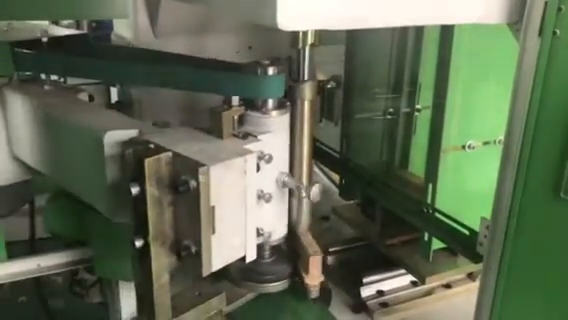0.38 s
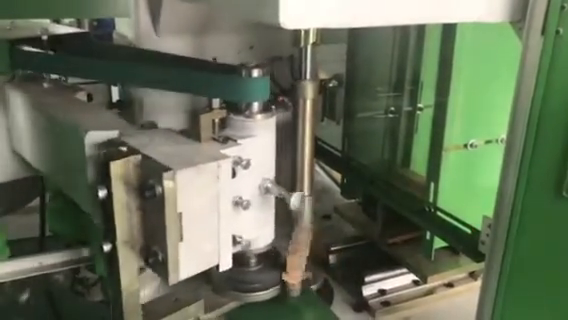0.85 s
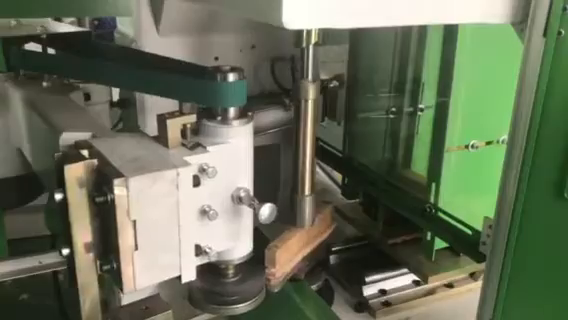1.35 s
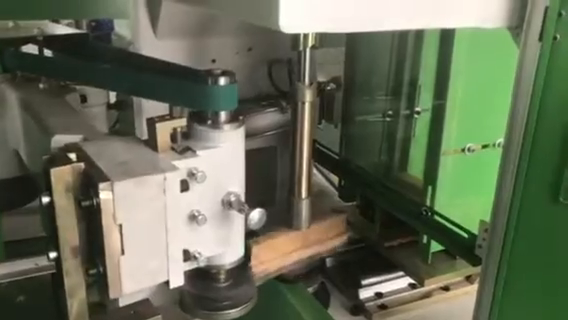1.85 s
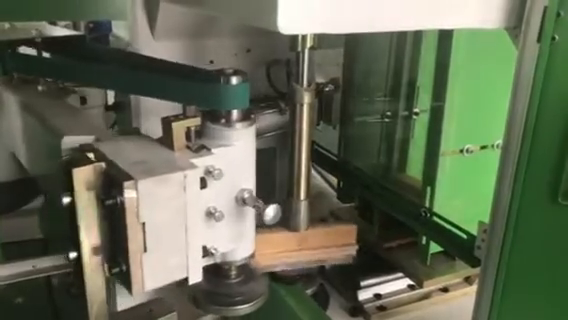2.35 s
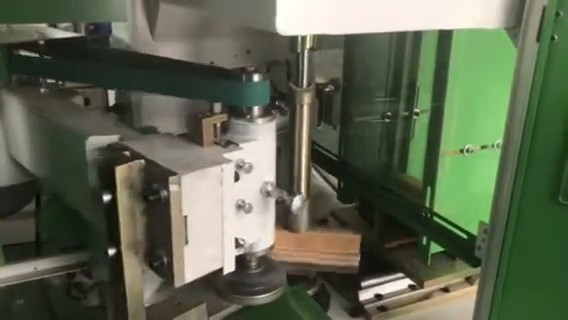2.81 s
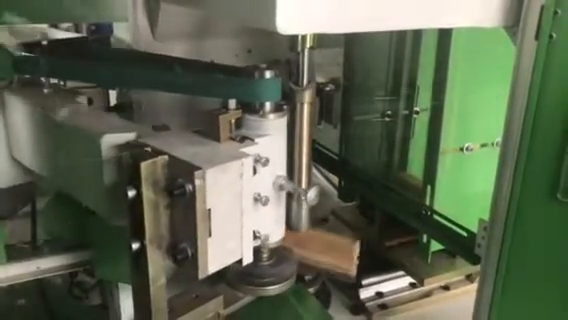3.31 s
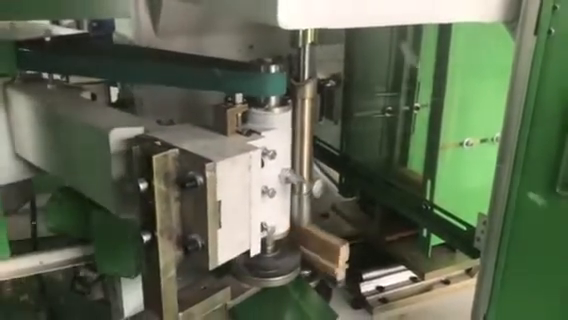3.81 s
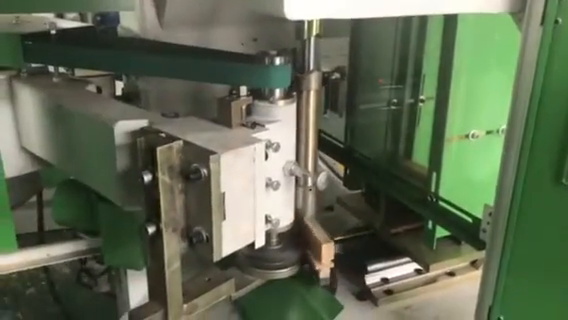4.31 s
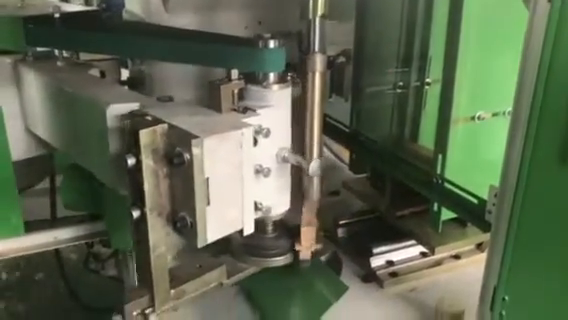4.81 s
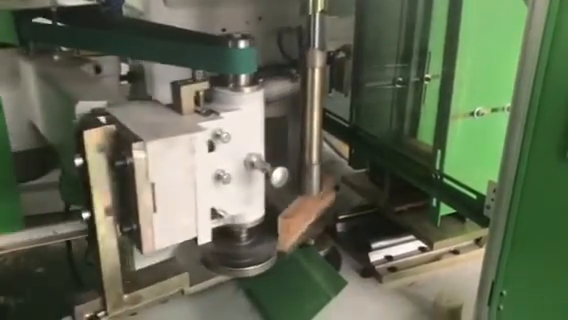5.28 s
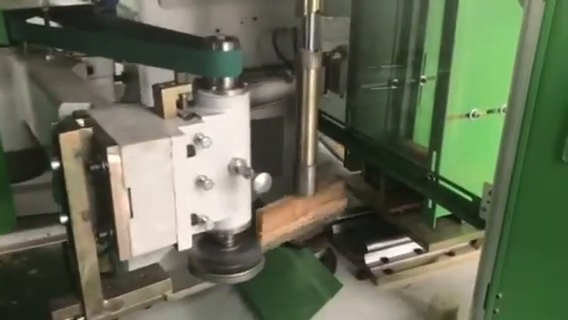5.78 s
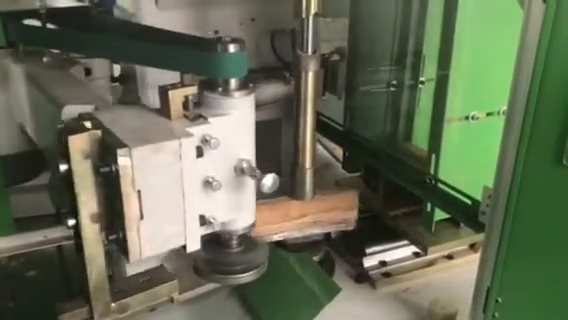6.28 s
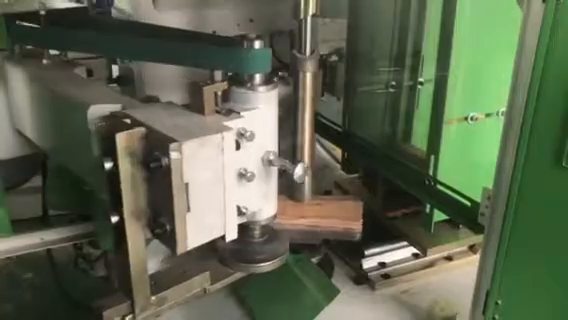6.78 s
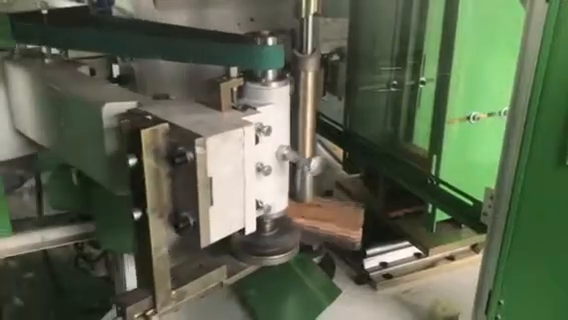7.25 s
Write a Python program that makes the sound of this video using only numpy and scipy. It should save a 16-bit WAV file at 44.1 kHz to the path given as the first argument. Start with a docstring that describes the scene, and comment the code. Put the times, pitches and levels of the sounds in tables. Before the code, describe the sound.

Close, dry mono sound of a wood shaper already at full speed. A steady low hum near 190 Hz, faint rumble and broad belt-and-motor roar run throughout, with a whine around 1150 Hz and its overtones. At about 0.3 s the knives bite the blank with a sharp buzzing attack, the pitch sagging slightly for an instant, and another hard bite follows near 0.45 s. The rasp continues with fluttering whistles; soft low thumps come between 1 and 2 s and high squeals swell at 1.4-1.9 s. A heavier, fuller ringing cut runs 1.9-2.7 s, then thinner, shifting whine to 4.7 s. Near 5.1 s the whine surges and bites at a corner. From 5.25 to 5.6 s the cut eases to lighter brushing, then rebuilds; ringing wood, bright squeals and chip hiss fill 5.8-6.7 s, and cutting carries on to the abrupt end around 7.4 s.

```python
"""Copy shaper, close by

A copy shaper mills a wooden blank with a six-knife head on a belt-driven spindle, close on a mono microphone.
The spindle hums once a turn and sags under load; the knives whine at six times that rate and its multiples,
and their unequal bite fills in every order between: all are sines locked to the turning spindle.
Blank and cutter head ring, and the frame thumps softly, over filtered noise for belt, motor and chips."""
import sys
import numpy as np
from scipy import signal
from scipy.fft import rfft, irfft, next_fast_len
from scipy.io import wavfile
from scipy.ndimage import uniform_filter1d, map_coordinates

SR = 44100
rng = np.random.default_rng(int(sys.argv[2]) if len(sys.argv) > 2 else 0)


def wav_record(signal):
    """Record a signal, one row per channel, as 16-bit PCM in the file named by sys.argv[1]."""
    frames = np.transpose(np.atleast_2d(signal))
    bounded = np.clip(frames, -1, 1)
    # unit amplitude maps onto the largest positive 16-bit level
    quanta = np.round(bounded * 32767).astype(np.int16)
    wavfile.write(sys.argv[1], SR, quanta)


def gain_from_db(level_db):
    """Convert decibel levels to linear amplitude factors (20 dB per decade)."""
    decades = np.asarray(level_db, float) / 20
    return 10 ** decades


N = 325439
STEPS = np.arange(0, N / SR + .01, .002)  # times of the slow controls [s]
SWELL_S, LEAVE_S = 0.1, 0.085  # rise and fall of rings and whistles; time to leave the wood


def unit(x):
    """Scales a signal to rms 1."""
    return x / np.sqrt(np.mean(x ** 2) + 1e-20)


def curves(rows):
    """Reads one control on the steps for each column after the time."""
    s, *cols = np.transpose(rows)
    return [np.interp(STEPS, s, c) for c in cols]


def smooth(control):
    """Reads a control at every sample."""
    return np.interp(np.arange(N) / SR, STEPS, control).astype(np.float32)


def wobble(rate):
    """A smooth random curve on the steps, rate knots a second."""
    return map_coordinates(rng.standard_normal(400), [STEPS * rate], mode="wrap")


def hump(s, length, rise, fall):
    """Up to 1 and back, reaching 0 by 0.37 of a ramp outside the span; short spans may peak below 1."""
    return np.clip(np.minimum((STEPS - s) / rise, (s + length - STEPS) / fall) + 0.37, 0, 1)


def rush(spectrum, patchy_db, panels=()):
    """Noise of rms 1 with patches of random gain, coloured by a spectrum and resonant panels."""
    z = signal.stft(rng.standard_normal(N + 512), nperseg=512)[2]
    field = uniform_filter1d(rng.standard_normal(z.shape), size=6, axis=0)
    field = uniform_filter1d(field, size=12, axis=1)
    noise = signal.istft(z * gain_from_db(patchy_db * unit(field)), nperseg=512)[1]
    m = next_fast_len(len(noise))
    hz = np.fft.rfftfreq(m, 1 / SR) + 1
    f, db = np.transpose(spectrum)
    colour = gain_from_db(np.interp(np.log(hz), np.log(f), db))
    peaks = sum(gain_from_db(2 * g) / (1 + (2 * (hz - c) / w) ** 2) for c, w, g in panels)
    return unit(irfft(rfft(noise, m) * colour * np.sqrt(1 + peaks), m)[:N])


# Speed of the spindle: (time [s], turns per second [Hz])
SPINDLE_SPEED = [(0.31, 192.0), (0.35, 190.18), (0.4, 189.53), (0.425, 191.7), (0.5, 191.4), (1.02, 191.4),
                 (1.25, 191.75), (1.86, 191.8), (1.95, 191.45), (2.78, 191.86), (2.95, 191.35),
                 (4.32, 191.38), (4.79, 191.0), (5.04, 190.25), (5.19, 191.5), (5.42, 191.88),
                 (6.55, 191.78), (6.68, 191.02), (6.99, 191.6), (7.33, 191.48)]


def spindle_turn():
    """Angle of the spindle [rad], summed from its speed and wrapped each turn."""
    turns = np.cumsum(smooth(curves(SPINDLE_SPEED)[0]), dtype=float) / SR
    return (2 * np.pi * (turns % 1)).astype(np.float32)


# Knives in the wood: (start [s], end [s], rise [s])
CUTTING_PASSES = [(0.29, 5.26, 0.058), (5.62, 7.6, 0.39)]


def cutting():
    """1 while the knives are in the wood, 0 while the head spins free."""
    return sum(hump(start, end - start, rise, LEAVE_S) for start, end, rise in CUTTING_PASSES)


# Low rumble, relative spectrum: (frequency [Hz], density [dB per Hz])
RUMBLE_SPECTRUM = [(20, -31), (50, 1.5), (110, 1.5), (160, 7), (230, -34)]


def rumble():
    """A low band of noise that wavers gently under everything."""
    return smooth(gain_from_db(-49.0 + 1.0 * wobble(9))) * rush(RUMBLE_SPECTRUM, patchy_db=1.0)


# Chip hiss, relative spectrum: (frequency [Hz], density [dB per Hz])
HISS_SPECTRUM = [(2500, -30), (5000, -3), (7000, .3), (8800, -1.5), (10500, -3), (12000, -1.5),
                 (14000, -.5), (15700, .5)]


def chip_hiss(turn, roar_db):
    """Bright noise follows part of the roar's swings, rises in the cut and throbs faintly once a turn."""
    idle_db, follows, cut_db = -24.5, 0.43, 2.15  # base [dB], share of the roar's swing, rise in the cut [dB]
    level_db = idle_db + follows * (roar_db - roar_db.mean()) + cut_db * cutting()
    level = smooth(gain_from_db(level_db + .5 * wobble(20) + .9 * wobble(45)))
    return level * (1 + .15 * np.sin(turn)) * rush(HISS_SPECTRUM, patchy_db=.7)


# Machine roar, relative spectrum: (frequency [Hz], density [dB per Hz])
ROAR_SPECTRUM = [(90, -53), (170, -9.5), (300, -10.5), (460, -10), (700, -6), (1000, -0.5), (1300, -2),
                 (1650, -3), (2000, -1.5), (3000, 0.5), (3700, -1.5), (4400, -4.5), (6000, -10.5),
                 (9000, -24.5)]
# Cabinet panels that colour the roar: (frequency [Hz], width [Hz], added resonance over the roar [dB])
CABINET_PANELS = [(316, 46, 4), (697, 6.9, 7.5), (860, 35, -2.5), (1000, 30, -17.5)]


def machine_roar(turn, roar_db):
    """Belt and motor: noise through resonant panels, throbbing faintly once a turn."""
    level = smooth(gain_from_db(roar_db + .3 * wobble(12) + .4 * wobble(40)))
    throb = 1 + 0.09 * np.sin(turn)
    return level * throb * rush(ROAR_SPECTRUM, patchy_db=.4, panels=CABINET_PANELS)


# Jolts of the frame: (time [s], length [s], frequency [Hz], peak level [dB])
FRAME_THUMPS = [(1.005, .05, 140, -34), (1.315, 0.07, 144, -30), (1.61, 0.059, 125, -33),
                (1.81, 0.061, 140, -31), (1.935, 0.049, 140, -36), (3.75, 0.25, 102, -40)]


def frame_thumps():
    """The feed carriage jolts the frame: short soft swells of a low mode."""
    sound = np.zeros(N + SR)
    for s, length, hz, db in FRAME_THUMPS:
        t = np.arange(round(length * SR)) / SR
        swell = np.sin(np.pi * t / length) ** 2
        sound[round(s * SR):][:len(t)] += gain_from_db(db) * swell * np.sin(2 * np.pi * hz * t)
    return sound[:N]


# Base strength of spindle orders 1, 2, 3, ..: (level [dB])
ORDER_LEVELS = [-29, -50, -48, -50, -38, -21, -38, -43, -48, -41, -39, -28, -36, -43, -37, -34, -40, -31,
                -33, -45, -48, -43, -39, -30, -43, -39, -47, -45, -44, -35, -44, -41, -49, -45, -40, -37,
                -42, -46, -53, -45, -42, -34, -44, -49, -54, -33, -40, -34, -45, -50, -53, -42, -44, -37,
                -44, -49, -53, -39, -40, -32, -44, -46, -54, -48, -46, -37, -45, -50, -52, -49, -46, -38,
                -42, -52, -54, -50, -47, -36, -46, -52, -55, -51]


def orders(group, level_db, drift_db, drift_rate, flicker_db):
    """Strengths of spindle orders under one control; each drifts and flickers at random on its own."""
    strength = {}
    for k in group:
        drift = drift_db * wobble(drift_rate)
        flicker = flicker_db * (wobble(16) + 1.25 * wobble(45))
        strength[k] = gain_from_db(ORDER_LEVELS[k - 1] + level_db) * unit(gain_from_db(drift + flicker))
    return strength


# Hard bites at the corners of the blank: (time [s], length [s], lift [dB], scaled for some orders)
CORNER_BITES = [(0.302, 0.024, 0.5), (0.414, 0.02, 6), (0.45, 0.016, 7.5), (5.154, 0.055, 3), (6.4, .14, 1),
                (6.64, 0.061, 3)]
# The knives only brush the blank between passes: (time [s], length [s], share of full contact)
BRUSHING = (5.2, .7, .8)
# Heavy cuts along the side of the blank: (time [s], length [s], lift [dB], scaled for high overtones)
HEAVY_CUTS = [(1.846, 0.85, 2), (5.848, .85, 0)]


def knife_load():
    """How the wood loads the knives [dB]: bites, full contact, brushing contact and heavy cuts."""
    idle_db = -17  # overtones while the head spins free
    bite_db = sum(db * hump(s, length, 0.01, 0.032) for s, length, db in CORNER_BITES)
    contact = cutting()
    start, length, share = BRUSHING
    brush = np.maximum(contact, share * hump(start, length, LEAVE_S, LEAVE_S))
    load_db = idle_db * (1 - contact) + bite_db
    brush_db = idle_db * (1 - brush) + bite_db
    heavy_db = sum(db * hump(s, length, SWELL_S, SWELL_S) for s, length, db in HEAVY_CUTS)
    return bite_db, load_db, brush_db, heavy_db


# Spindle orders of each ringing part: blank, lower head squeal, upper head squeal
PART_ORDERS = [
    [13, 14, 15, 16, 17, 19],
    [46, 47, 48],
    [58, 59, 60],
]
# Level of each part between its rings, over its base: (level [dB])
PART_QUIET = [-8.5, -6.5, -4]
# A part rings up: (time [s], length [s], part: 0 blank, 1 lower squeal, 2 upper squeal, level over base [dB])
PART_RINGS = [(0.75, 0.13, 2, 3), (1.35, .56, 1, 6.6), (1.4, 0.49, 2, 7.4), (1.851, .9, 0, 2),
              (1.9, 0.87, 1, 0.94), (1.9, .7, 2, 0.27), (2.87, 0.085, 1, 4.2), (2.87, .1, 2, 3.9),
              (3.2, .45, 0, 0.58), (4.05, .4, 2, 0.9), (4.3, .3, 0, 0.67), (5.82, 0.17, 0, 3.1),
              (5.9, 0.2, 1, 5.3), (5.9, 0.16, 2, 2.4), (6.15, .6, 0, 2.2), (6.15, 0.33, 1, 1.5),
              (6.5, .15, 2, 2.8)]


def part_rings(load_db):
    """Resonances of blank and cutter head lift a few neighbouring orders."""
    strength = {}
    for part, group in enumerate(PART_ORDERS):
        ring = gain_from_db(PART_QUIET[part] + load_db)
        for s, length, which, db in PART_RINGS:
            if round(which) == part:
                ring = ring + gain_from_db(db) * hump(s, length, SWELL_S, SWELL_S)
        group_strength = orders(group, 0, drift_db=1.25, drift_rate=3.5, flicker_db=1.35)
        strength |= {k: ring * gain for k, gain in group_strength.items()}
    return strength


# Single orders that sing out: (time [s], length [s], spindle order, level at full swell before chatter [dB])
SINGING_ORDERS = [(0.31, 0.086, 66, -23), (0.353, .13, 18, -22.5), (0.44, 0.15, 24, -25.5),
                  (0.6, .08, 24, -30), (0.66, .15, 72, -30), (0.45, .65, 7, -35), (0.67, 0.21, 54, -29.5),
                  (0.806, .36, 17, -26.5), (1.08, 0.078, 18, -22.5), (1.1, 0.21, 48, -27),
                  (1.15, 0.43, 54, -31), (1.3, 0.45, 18, -29), (1.3, 0.66, 24, -30), (1.36, .34, 42, -31),
                  (1.6, 0.25, 35, -28.5), (1.58, 0.22, 54, -26), (1.99, 0.35, 24, -23),
                  (2.05, 0.71, 18, -25.5), (2.2, 0.37, 26, -28.5), (2.3, 0.27, 36, -28),
                  (2.443, 0.15, 54, -24.5), (2.429, 0.43, 16, -27.5), (2.017, 1.04, 7, -34.5),
                  (2.9, 2.1, 5, -36), (3.9, 1.2, 2, -45), (2.954, 0.41, 24, -29), (3.05, .58, 11, -30.5),
                  (3.32, .28, 36, -28.5), (3.448, 0.52, 18, -28), (3.708, 1.02, 3, -41),
                  (3.79, 0.37, 48, -31), (3.95, 0.78, 18, -34.5), (3.99, .17, 66, -29),
                  (4.39, .29, 72, -30), (4.1, 0.19, 24, -39), (4.6, 0.22, 54, -29), (4.643, .2, 32, -28),
                  (4.784, 0.094, 18, -26), (4.95, .15, 78, -27), (4.994, 0.2, 24, -23.5),
                  (5.0, .28, 48, -33), (5.13, .08, 17, -23), (5.127, 0.15, 18, -27), (5.143, .12, 54, -27),
                  (5.524, 0.1, 24, -26), (5.82, .08, 18, -33), (5.9, .08, 24, -23), (5.91, .14, 66, -29),
                  (5.96, 0.33, 41, -29), (6.22, .28, 24, -30), (6.274, .25, 42, -25.5),
                  (6.36, 0.19, 30, -24.5), (6.36, 0.49, 18, -29), (6.42, 0.24, 16, -24.5),
                  (6.5, 0.18, 41, -26), (6.512, 0.12, 54, -22.5), (6.683, .2, 7, -27.5),
                  (6.735, 0.23, 30, -27.5), (6.955, 0.36, 24, -25), (6.973, .31, 36, -30),
                  (7.133, 0.13, 54, -24), (7.136, 0.19, 18, -27), (7.18, 0.26, 19, -28)]


def add_whistles(strength):
    """Adds the power of brief whistles to the orders they share."""
    for s, length, k, db in SINGING_ORDERS:
        whistle = gain_from_db(db) * hump(s, length, SWELL_S, SWELL_S)
        strength[round(k)] = np.hypot(strength[round(k)], whistle)


# Knife levels over their base: (time [s], knife tone [dB], its octave [dB])
KNIFE_LEVELS = [(0.27, -7, -20), (0.31, -3, 11), (0.37, -10, -6), (0.41, -8, 6), (0.485, -21, -3),
                (0.51, -15, 6), (0.66, -5.5, 4.5), (0.77, 0, -9), (0.97, 3, 4), (1.124, -3.5, 1.5),
                (1.55, 0.5, 1), (1.85, 2, 4), (1.96, 0, 3.5), (2.16, 2, -0.5), (2.6, -1, -4),
                (2.75, -4.5, -8), (2.82, 1.5, -4), (2.99, 3.5, 3.5), (3.15, 0.5, -4), (3.4, -9.5, 0),
                (3.536, -38, 2), (3.69, -9.5, 3), (3.89, -6.5, -4), (3.95, -6.5, -9), (4.45, -10, -23),
                (4.82, 3.5, 4.5), (4.96, 6.5, -5), (5.085, 5.5, 9), (5.19, -6, 5.5), (5.25, -6.5, 4),
                (5.41, -1.5, -6.5), (5.61, -1, 1), (5.85, 4, 3.5), (6.06, 2.5, 0.5), (6.25, 3.5, 3.5),
                (6.52, -4.5, -8), (6.65, -12, -3), (6.71, 4.5, 6), (6.85, 6, -3), (6.98, 5, 2.5),
                (7.16, 1, -1), (7.37, -5, -2)]
# Spindle orders of each control: knife tone, octave, 3rd and 4th multiples, higher overtones
KNIFE_MULTIPLES = [
    [6],
    [12],
    [18, 24],
    [30, 36, 42, 54, 66, 72, 78],
]


def cutter(turn, hum_db):
    """Knife passes give every sixth order; knives set unequally give the rest; resonances lift a few."""
    tone_db, octave_db = curves(KNIFE_LEVELS)
    bite_db, load_db, brush_db, heavy_db = knife_load()
    tone, octave, middle, high = KNIFE_MULTIPLES
    named = sum(KNIFE_MULTIPLES + PART_ORDERS, [1])
    rest = [k for k in range(1, len(ORDER_LEVELS) + 1) if k not in named]
    # order 1 is the hum of the unbalanced spindle
    strength = orders([1], hum_db, drift_db=0.53, drift_rate=8, flicker_db=0.37)
    strength |= orders(rest, load_db + heavy_db, drift_db=5.5, drift_rate=2.202, flicker_db=2.0)
    strength |= orders(tone, tone_db + 1.35 * bite_db, drift_db=0.87, drift_rate=8.8, flicker_db=0.1)
    strength |= orders(octave, octave_db + bite_db, drift_db=2.0, drift_rate=14.0, flicker_db=-0.2)
    strength |= orders(middle, 0.72 * brush_db - 4.5, drift_db=-0.5, drift_rate=7, flicker_db=1.3)
    strength |= orders(high, brush_db + 0.59 * heavy_db, drift_db=3.5, drift_rate=6, flicker_db=1.5)
    strength |= part_rings(load_db)
    add_whistles(strength)
    # the grain of the wood makes the bite chatter: the higher orders flicker together
    chatter_db = 0.76 * wobble(24) + 0.82 * wobble(60)
    sound = np.zeros(N)
    for k, gain in strength.items():
        # each order starts at a random phase and slips a little [rad]
        slip = 2 * np.pi * rng.random() + (0.023 + 0.0027 * k) * wobble(30) + 0.002 * k * wobble(50)
        level = smooth(gain * gain_from_db(chatter_db * min(k / 40, 1)))
        sound += level * np.sin(k * turn + smooth(slip))
    return np.sqrt(2) * sound  # strengths are rms


# Machine levels: (time [s], unbalance hum over its base [dB], roar [dB])
MACHINE_LEVELS = [(0.3, 2, -20.5), (0.37, 0, -26), (0.45, 3.5, -19.5), (0.8, 1, -22), (1.35, 1.5, -21),
                  (1.75, -6.5, -23.5), (2.06, -4, -24.5), (2.7, 3.5, -22), (3.14, 3, -22.5),
                  (3.75, -2, -21.5), (4.0, -3, -22), (4.72, -0.5, -22), (5.05, -2.5, -24), (5.26, -3, -22),
                  (5.4, 2, -21.5), (5.55, -1.5, -22), (6.11, -6.5, -24), (6.5, -2, -24.5), (6.86, 4, -22),
                  (7.27, -1.5, -22)]


def scene():
    """Rumble, hiss, roar, thumps and cutter at one close microphone, the same on both channels."""
    hum_db, roar_db = curves(MACHINE_LEVELS)
    turn = spindle_turn()
    background = rumble() + chip_hiss(turn, roar_db) + machine_roar(turn, roar_db)
    mono = background + frame_thumps() + cutter(turn, hum_db)
    return np.array([mono, mono])


def roll_off(x):
    """The treble ends steeply here."""
    return signal.sosfilt(signal.butter(12, 17070, fs=SR, output="sos"), x)


def record(dry):
    """The recorder rounds off the peaks and keeps nothing above its band limit."""
    clip_top, top_hz = .72, 15760  # ceiling of the peaks [full scale], band limit [Hz]
    rounded = dry / (1 + np.abs(dry / clip_top) ** 6) ** (1 / 6)
    m = next_fast_len(N)
    in_band = np.fft.rfftfreq(m, 1 / SR) < top_hz
    mix = irfft(rfft(rounded, m) * in_band, m)[:, :N]
    return roll_off(mix)


dry = scene()
out = record(dry)
wav_record(out)
```